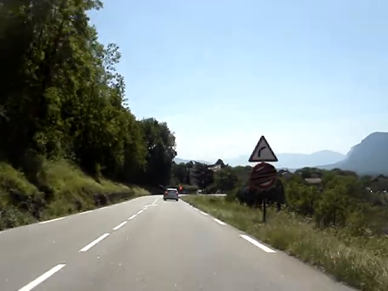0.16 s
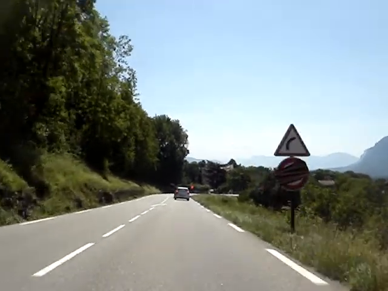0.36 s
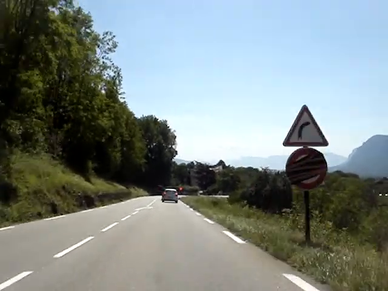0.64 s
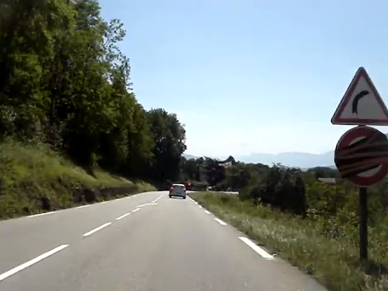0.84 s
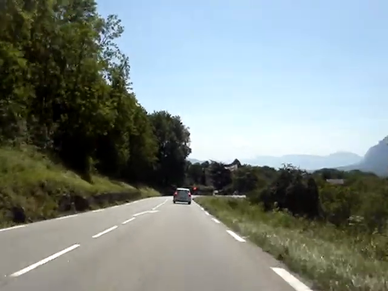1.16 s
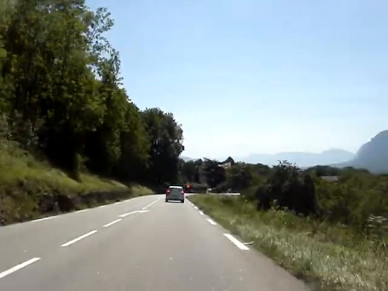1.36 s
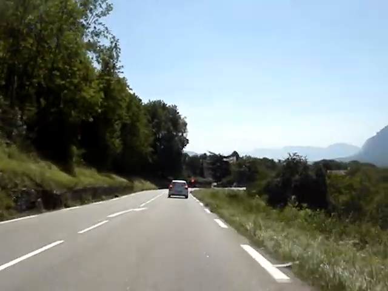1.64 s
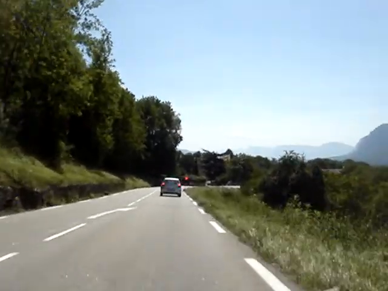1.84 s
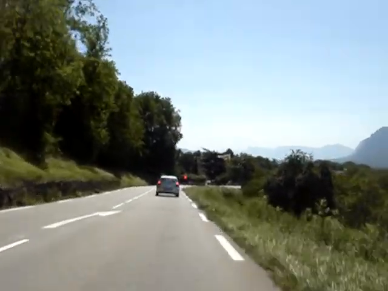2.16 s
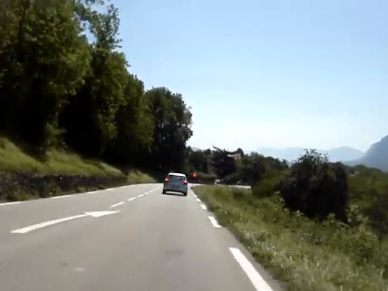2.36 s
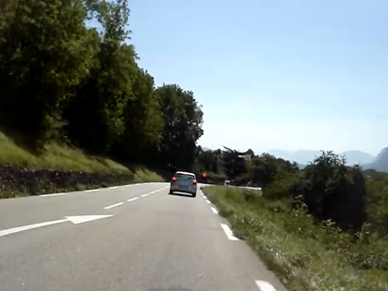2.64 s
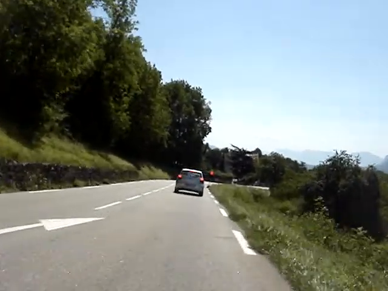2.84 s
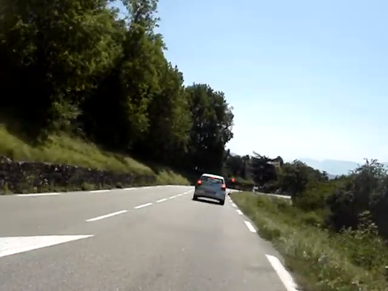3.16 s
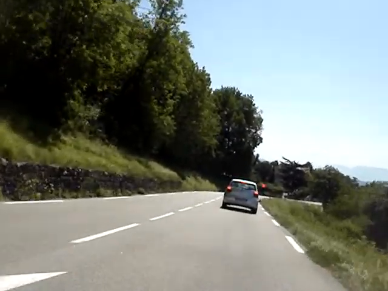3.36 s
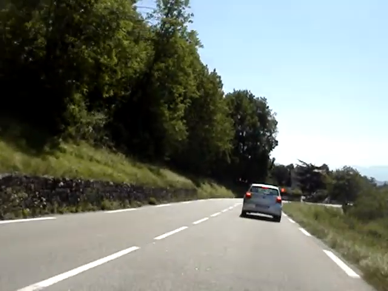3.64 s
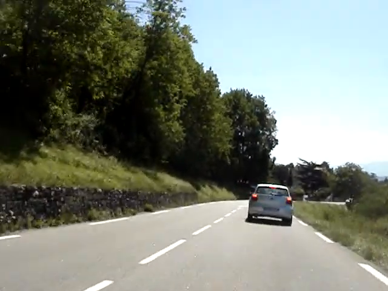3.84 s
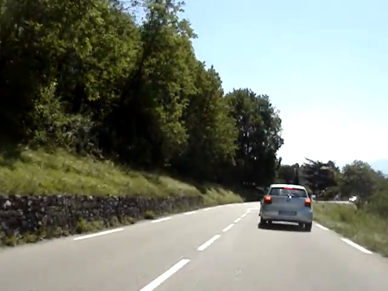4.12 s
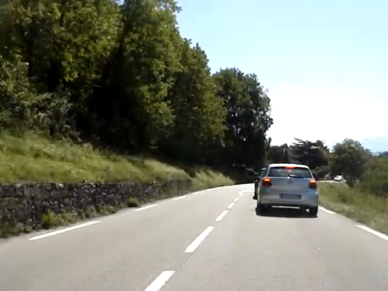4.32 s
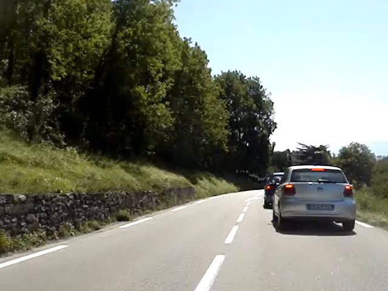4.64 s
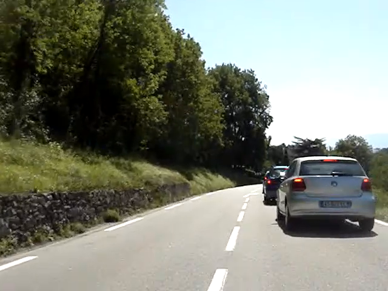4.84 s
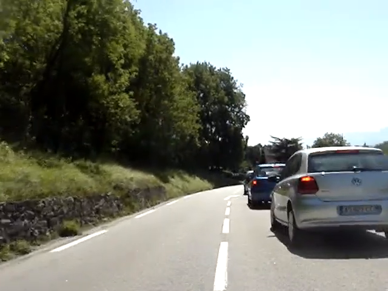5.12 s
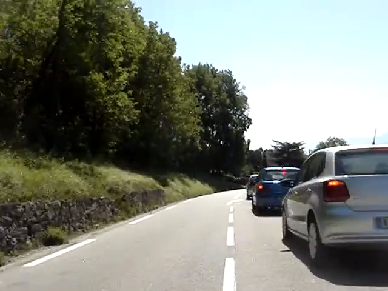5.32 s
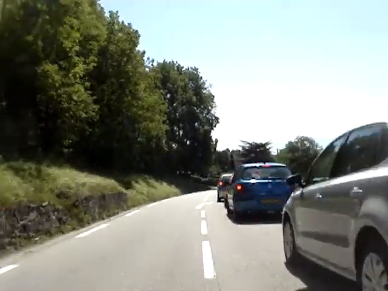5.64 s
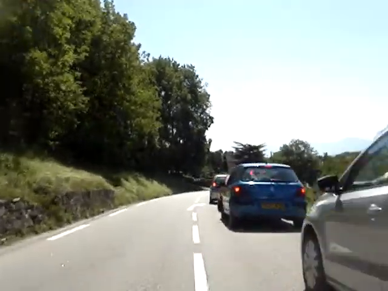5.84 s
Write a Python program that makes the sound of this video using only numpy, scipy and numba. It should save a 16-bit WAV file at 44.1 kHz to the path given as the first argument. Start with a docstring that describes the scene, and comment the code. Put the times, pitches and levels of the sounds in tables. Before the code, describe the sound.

Wind rushes over a small camera microphone on a bicycle coasting along an open road towards queued cars. Dense, irregular thumps and a rough roar dominate the first seconds, then become sparser and duller. Underneath run a low wake rumble and a steady raspy hiss of air and tyres, with short bright ticks, more frequent near the end. No distinct engines.

```python
"""Wind rushes over the microphone of a camera on a bicycle coasting down an open road towards a queue of cars.
Eddies sweep across the port, each one a single swing of pressure: countless small ones roar, big ones thump.
Behind them the camera's wake rumbles, air and tyres hiss through the ringing housing,
with short bright ticks and gritty bursts in the hiss; a fast limiter holds the crests."""
import sys
import numpy as np
from scipy import signal
from scipy.fft import rfft, irfft
from scipy.io import wavfile
from scipy.ndimage import uniform_filter1d, minimum_filter1d, map_coordinates
from numba import njit

SR = 44100
rng = np.random.default_rng(int(sys.argv[2]) if len(sys.argv) > 2 else 0)


def materialize(psi):
    """Save the field psi as 16-bit PCM at rate SR to the path in sys.argv[1].

    A 1-D psi becomes a single channel; in a 2-D psi each row is a channel.
    """
    bounded = np.clip(np.atleast_2d(psi).T, -1, 1)
    quanta = np.round(bounded * 32767).astype(np.int16)
    wavfile.write(sys.argv[1], SR, quanta)


N = 263718
TIME = np.arange(N) / SR  # s


def undb(db):
    """Decibels to gain."""
    return 10 ** (np.asarray(db) / 20)


def unit(x):
    """Scale to rms 1."""
    return x / np.sqrt(np.mean(x ** 2))


def curve(rows):
    """Rows (s, value) joined by straight lines."""
    return np.interp(TIME, *np.transpose(rows))


def walk(rate):
    """Smooth random course through about rate knots a second; rms 1."""
    knots = rng.standard_normal(N // 10)
    return unit(map_coordinates(knots, [TIME * rate], order=2, mode="wrap"))


def below(x, hz):
    """The part of a sound under a frequency."""
    return signal.sosfiltfilt(signal.butter(4, hz, fs=SR, output="sos"), x)


def colour(x, points, modes=()):
    """Filter by a smooth spectrum, with the power of any resonances added to it."""
    f = np.arange(N // 2 + 1) * SR / N + 1e-6  # just above zero, for the logarithm
    hz, db = np.transpose(points)
    power = undb(np.interp(np.log(f), np.log(hz), db)) ** 2
    for centre, width, peak_db in modes:
        resonance = 1 / (1 + ((f - centre) / width) ** 2) ** 2
        power = power + undb(peak_db) ** 2 * resonance
    return irfft(rfft(x) * np.sqrt(power), N)


def rush(level_db=7, flutter_db=1.05, rasp_db=1.5, grit_db=1.54, waver_db=3.5, flicker_db=3.0,
         top_db=5.0, top_growth_db=2.5):
    """Air and tyres hiss through the housing; the middle rasps, the treble level wavers fast and unevenly."""
    # steady rush of air and tyres: time_s [s], level_db [dB, relative]
    rush_levels = [(0.05, -42), (0.25, -44), (0.75, -45.5), (1.2, -42.5), (1.55, -43.5), (1.9, -40),
                   (2.11, -45), (2.22, -42.5), (2.8, -43), (3.36, -40.5), (3.45, -46), (3.52, -40),
                   (3.8, -43.5), (4.5, -42), (4.82, -44), (4.95, -42), (5.08, -42.5), (5.417, -42),
                   (5.428, -47), (5.53, -44), (5.66, -42), (5.98, -40)]
    # tone of the rush: frequency_hz [Hz], density_db [dB per Hz, relative]
    rush_tone = [(100, -7), (500, -23.5), (950, 4.5), (1250, 6.5), (1800, -1), (2400, -1), (3200, -2),
                 (4200, -7.5), (5500, -16.5), (7300, -24), (8500, -23.5), (10000, -28.5)]
    # cavities of the housing: centre_hz [Hz], half_width_hz [Hz, to a quarter of the power], peak_db [dB, relative]
    cavities = [(858, 78, 11.5), (1467, 23, 12.5), (1748, 53, 6), (2082, 103, 5.5), (2850, 296, 1.5),
                (4740, 120, -11.5)]
    hiss = unit(colour(rng.standard_normal(N), rush_tone, cavities))
    body, under_top, under_air = below(hiss, 1400), below(hiss, 5100), below(hiss, 7000)
    progress = TIME / TIME[-1]

    rasp_course_db = rasp_db * walk(220) + grit_db * progress ** 2 * walk(70)
    rasp = (under_top - body) * undb(rasp_course_db)

    # two treble bands share the wavering; each flickers by itself
    waver = waver_db * walk(300)
    top = 0
    for band in (under_air - under_top, hiss - under_air):
        top = top + band * undb(waver + flicker_db * walk(150))
    # the treble grows towards the queue of cars
    top = top * undb(top_db + top_growth_db * progress)

    fluttering = (body + rasp) * undb(flutter_db * walk(50))
    return (fluttering + top) * undb(curve(rush_levels) + level_db)


def ticks(level_db=-6, click_db=5):
    """Short bright ticks and gritty bursts in the hiss: a click and decaying noise, each with its own brightness."""
    # ticks and bursts: start_s [s], level_db [dB, relative], bright_hz [Hz], decay_s [s, to 1/e of amplitude]
    tick_rows = [(1.156, -27, 5500, .003), (1.1965, -24, 5000, .003), (1.2045, -28, 5500, 0.0036),
                 (1.2685, -36, 6000, .001), (1.392, -31, 5500, .003), (3.3495, -26, 4500, .0045),
                 (3.479, -25.5, 5600, .0045), (4.1451, -17, 5500, .001), (4.17, -27, 5540, .003),
                 (4.233, -29, 5500, .004), (4.285, -30, 5500, .004), (4.6942, -17.5, 4600, .0055),
                 (4.914, -24, 3100, .0045), (4.993, -24, 2820, .004), (5.012, -23, 3020, .003),
                 (5.124, -23.5, 2900, .004), (5.188, -23, 2700, .004), (5.2745, -21, 3500, .0045),
                 (5.366, -20.5, 2920, .004), (5.407, -27, 4000, .003), (5.4179, -20.5, 6200, .0013)]
    # tone of a tick: multiple [of its bright_hz], density_db [dB per Hz, relative]
    tick_tone = [(.13, -32), (.62, 4.5), (.92, 4.5), (1.2, 0), (1.7, -6), (2.6, -31)]
    out = np.zeros(N)
    noise = rng.standard_normal(N)
    for start, db, hz, decay_s in tick_rows:
        points = [(hz * multiple, gain_db) for multiple, gain_db in tick_tone]
        click = colour(signal.unit_impulse(N, int(start * SR)), points)
        decay = np.exp(-np.minimum(np.abs(TIME - start) / decay_s, 20))
        burst = unit(colour(noise, points)) * (TIME >= start) * decay
        out += undb(db + level_db) * (burst + undb(click_db) * click / click.max())
    return out


def rumble(gust_db, flutter_db=2.0, level_db=-34, growth_db=3.0, follow=0.44):
    """The camera's broad wake flutters low, swells and drops with the gusts and grows towards the cars ahead."""
    # tone of the wake: frequency_hz [Hz], density_db [dB per Hz, relative]
    wake_tone = [(20, -9.5), (45, -12.5), (70, -5), (110, 3), (200, 0), (400, -15), (800, -4), (2000, -56)]
    wake = unit(colour(rng.standard_normal(N), wake_tone))
    swell_db = follow * (gust_db - gust_db.mean())
    growth = growth_db * TIME / TIME[-1]
    return wake * undb(level_db + swell_db + growth + flutter_db * walk(25))


def turbulence(attack_s=0.027, release_s=0.0055):
    """Relative level in dB at the port: each gust swells, holds and dies away over the breeze."""
    # gusts that break on the port: start_s [s], length_s [s], strength_db [dB, relative]
    gusts = [(0.172, 0.17, -18), (0.43, 0.1, -21.5), (0.554, 0.16, -23), (0.812, 0.16, -21),
             (1.105, 0.086, -21), (1.317, .105, -21.5), (1.574, 0.13, -20), (1.895, 0.23, -22),
             (2.06, 0.17, -21.5), (2.542, 0.058, -25.5), (3.11, 0.23, -22.5), (3.269, 0.059, -25),
             (3.367, 0.035, -19.5), (4.18, 0.1, -26.5), (4.438, 0.12, -24), (4.616, 0.045, -24)]
    # turbulence left between the gusts: time_s [s], level_db [dB, relative]
    breeze = [(0, -21), (0.74, -30), (1.05, -22.5), (1.3, -24), (1.5, -22.5), (1.83, -24.5), (2.25, -25.5),
              (2.68, -28), (3.2, -26.5), (3.56, -23), (4.0, -26.5), (4.8, -29), (4.95, -27), (5.41, -28),
              (5.44, -35), (5.55, -35.5), (5.63, -27), (5.98, -26.5)]
    power = undb(curve(breeze)) ** 2
    for start, length, db in gusts:
        before = np.maximum(start - TIME, 0) / attack_s
        after = np.maximum(TIME - start - length, 0) / release_s
        gust = undb(db) ** 2 * np.exp(-np.minimum(before + after, 20) ** 2)
        power = np.maximum(power, gust)
    return 10 * np.log10(power)


def eddies(times, sizes, pitches, sharpness=2.64, skew=0.54):
    """Each passing vortex gives a dip, a crest, then suction, deeper with more skew; small ones pass faster."""
    index = (times * SR).astype(int)[:, None] + np.arange(-300, 300)  # samples around each passage
    # the spectrum of each swing peaks at its pitch
    passage = 2 * np.pi * pitches[:, None] * (index / SR - times[:, None]) / sharpness
    angle = np.arctan(passage)
    swing = np.cos(angle) ** (sharpness + 1) * np.cos(skew + (sharpness + 1) * angle)
    return np.bincount((index % N).ravel(), (sizes[:, None] * swing).ravel(), N)


def stream(gust_db, count, start_hz, end_hz, spread, scatter_db, rise, small_loss_db=3.0):
    """Random eddies at rms 1, brighter in gusts and duller as the bicycle slows; the smallest are weaker."""
    place = rng.random(count)
    size, pitch = rng.standard_normal((count, 2)).T
    times = (np.arange(count) + place) / count * N / SR
    force_db = np.interp(times, TIME, gust_db - gust_db.mean())
    middle_hz = np.interp(times, TIME[[0, -1]], [start_hz, end_hz])
    pitches = middle_hz * np.exp(spread * np.clip(pitch, -2, 2) + rise * force_db)
    sizes = undb(scatter_db * np.minimum(size, 2) - small_loss_db * np.maximum(pitch, 0) ** 2)
    return unit(eddies(times, sizes, pitches, sharpness=6.3, skew=0.59))


def roar(gust_db, coarse_db=-3.0, fine_db=-9.5, fine_growth=0.24):
    """Middling eddies roar; strong gusts break them up into finer, crackling ones."""
    coarse = stream(gust_db, count=2400, start_hz=460, end_hz=354, spread=0.39, scatter_db=5.0, rise=0.002)
    fine = stream(gust_db, count=1500, start_hz=860, end_hz=685, spread=0.33, scatter_db=5.5, rise=0.029)
    break_up_db = fine_db + fine_growth * (gust_db - gust_db.mean())
    return undb(gust_db) * (coarse * undb(coarse_db) + fine * undb(break_up_db))


def buffets(level_db=6.5, swirl_db=-7.5, swirl_s=0.001634, swirl_ratio=1.495, swirl_scatter_db=2.5,
            snap_start_hz=1250, snap_end_hz=850, thud_db=-17, thud_limit_db=-7, thud_hz=145):
    """Big eddies thump on the diaphragm, each with a faster swirl on either flank, a snap and a low thud."""
    # big eddies: time_s [s], size_db [dB, relative], pitch_hz [Hz], snap_db [dB, added to size_db]
    thumps = [(0.072, -20, 430, -14), (0.1266, -18.5, 430, -20), (0.141, -17.5, 410, -17),
              (0.156, -7, 378, -17), (0.161, -18, 320, -14), (0.1674, 3.5, 450, -16),
              (0.177, -14, 530, -10), (0.184, -4, 353, -4), (0.2246, -3.5, 563, -4), (0.2325, -2, 420, -7),
              (0.2505, -6, 540, -16), (0.2582, -1, 490, -14), (0.269, -21, 680, -14), (0.2752, -8, 330, -8),
              (0.291, -16, 480, -13), (0.2967, -7, 376, -15), (0.3141, -4, 348, -15),
              (0.3241, -8, 344, -13), (0.349, -20, 590, -15), (0.3944, -15, 430, -18),
              (0.4223, -17, 483, -18), (0.434, -17, 650, -15), (0.4457, -0.5, 455, -9),
              (0.483, -14, 553, -12), (0.4932, -7, 414, -3), (0.5, -24, 480, -12), (0.505, -12, 580, 0),
              (0.546, -14, 390, -10), (0.5555, -6, 630, 2), (0.563, -4, 384, -7), (0.572, -11, 450, -4),
              (0.5808, -7, 500, -12), (0.5928, -15, 620, -9), (0.5984, -4, 480, -8), (0.6087, -5, 365, -5),
              (0.617, -16, 560, -12), (0.6259, -11, 540, 4), (0.635, -17, 600, -8), (0.6442, -6, 397, 4),
              (0.6531, -11, 420, -14), (0.6624, -11, 425, -5), (0.675, -10, 527, -24),
              (0.693, -1, 480, -10), (0.7034, -9, 530, -14), (0.712, -0.5, 600, 0), (0.729, -6, 430, -5),
              (0.7441, -11, 350, -12), (0.757, -7, 483, -22), (0.7767, -11.5, 357, -16),
              (0.784, -16, 470, -14), (0.798, -11, 430, -15), (0.836, -4.5, 420, -25),
              (0.858, -18, 530, -12), (0.871, -16, 390, -5), (0.885, -18, 480, -4), (0.8975, -7, 436, -6),
              (0.9461, -10, 386, -15), (0.9607, -9, 350, -13), (1.029, -19, 480, -12),
              (1.1072, -6, 465, -12), (1.138, -16, 650, -15), (1.144, -12, 390, -5), (1.162, -10, 480, -7),
              (1.183, -11, 434, -4), (1.1912, -12, 600, -26), (1.1987, -17, 390, -4), (1.221, -1, 505, -8),
              (1.2387, -4, 432, -2), (1.2478, -0.5, 520, -5), (1.2565, -5, 390, -12),
              (1.267, -22, 430, -14), (1.2791, -7, 440, -14), (1.2898, -7, 390, -13), (1.31, -22, 400, -16),
              (1.3188, -1, 470, -10), (1.328, -6, 540, -15), (1.3356, -8, 300, -5), (1.3445, -14, 390, -11),
              (1.3539, -7, 403, -17), (1.362, -10, 420, -13), (1.372, -17, 390, -5), (1.394, -18, 580, -14),
              (1.4028, -10, 346, -10), (1.4204, 1, 370, -5), (1.468, -18, 570, -12),
              (1.499, -15.5, 470, -12), (1.504, -18, 377, -14), (1.534, -20, 360, -12),
              (1.543, -16, 430, -14), (1.5633, -11, 300, -4), (1.5987, -13, 370, -10), (1.6071, 1, 330, -8),
              (1.636, -21, 420, -12), (1.653, -15, 440, -10), (1.6683, -9, 346, -1), (1.7063, -6, 350, -10),
              (1.7162, -15, 310, -18), (1.77, -20, 436, -15), (1.78, -9, 336, -17), (1.889, -22, 450, -12),
              (1.897, -17, 550, -15), (1.9095, -15, 640, -17), (1.9142, -14, 353, -16),
              (1.9548, -6, 410, -22), (1.9648, -9, 332, -31), (1.9756, -17, 380, -6),
              (1.985, -17, 520, -14), (2.008, -15, 400, -12), (2.02, -4, 395, -18), (2.0655, 0, 446, -15),
              (2.074, -15, 490, -16), (2.089, -20, 460, -12), (2.096, -8, 433, -17), (2.1143, -8, 310, -7),
              (2.144, -9, 308, -7), (2.157, -7, 393, -6), (2.1975, -12.5, 390, -10),
              (2.215, -17.5, 370, -14), (2.233, -16.5, 610, -15), (2.247, -19, 590, -12),
              (2.3065, -1, 460, -19), (2.3888, -5, 382, -26), (2.406, -21, 440, -14),
              (2.428, -16.5, 430, -18), (2.4554, -4.5, 400, -9), (2.5018, -13.5, 280, -8),
              (2.517, -18.5, 440, -16), (2.528, -18, 405, -15), (2.537, -17, 523, -18),
              (2.5466, -9, 343, -18), (2.553, -18, 398, -20), (2.574, -9, 388, -12),
              (2.588, -7.5, 308, -20), (2.629, -21.5, 350, -14), (2.7271, -15, 343, -14),
              (2.7386, -12, 382, -10), (2.746, -19, 380, -12), (2.7706, -13.5, 280, -17),
              (2.7973, -6, 278, -20), (2.9333, -6, 427, -10), (2.9517, -3.5, 420, -20),
              (3.018, -2.5, 430, -19), (3.025, -6, 420, -19), (3.048, -21, 400, -16),
              (3.0702, -12, 348, -24), (3.098, -15, 330, -1), (3.112, -9, 390, -12), (3.122, -18, 390, -8),
              (3.139, -14, 390, -11), (3.15, -16, 318, -18), (3.161, -23.5, 360, -12),
              (3.1699, -15, 440, -10), (3.176, -23, 360, -14), (3.188, -1.5, 380, -12),
              (3.22, -20, 320, -12), (3.237, -22, 418, -20), (3.2661, -4, 330, -10), (3.292, -12, 452, -14),
              (3.3016, 1, 406, -5), (3.32, -14, 450, -12), (3.331, -8, 390, -10), (3.3492, -11, 360, -14),
              (3.37, -4, 350, -24), (3.374, -14, 560, -14), (3.3843, -6, 390, -18), (3.395, -2, 286, -3),
              (3.4035, 3, 430, 4), (3.4129, -7, 310, -7), (3.4308, -1, 387, -19), (3.495, -23, 320, -14),
              (3.6987, -3.5, 485, -22), (3.765, -17.5, 450, -14), (3.7902, -11, 347, -12),
              (3.8053, -6.5, 346, -3), (3.817, -20, 380, -16), (3.882, -15.5, 384, -20),
              (3.908, -2, 424, -13), (3.9185, -12, 346, -9), (4.0549, -15, 345, -22),
              (4.146, -11, 310, -10), (4.1868, -4, 322, -3), (4.199, -7.5, 316, -18),
              (4.2281, -15.5, 387, -8), (4.2447, -5, 386, -7), (4.2629, -11, 383, -11),
              (4.274, -10, 390, -16), (4.288, -10, 436, -14), (4.3035, -1, 343, -26),
              (4.348, -7.5, 370, -18), (4.4032, -12, 384, -10), (4.429, -15, 360, -16),
              (4.4451, -9, 350, -17), (4.458, -15, 348, -16), (4.471, -19, 460, -18),
              (4.4848, -4, 363, -19), (4.5006, -13, 330, -14), (4.514, -7, 390, -8), (4.523, -19, 450, -14),
              (4.538, -17.5, 440, -16), (4.545, -19, 537, -18), (4.579, -17.5, 330, -16),
              (4.63, -5, 290, -24), (4.6442, -10, 374, -21), (4.669, -4.5, 308, -20),
              (4.7205, -15, 285, -10), (4.7624, -10, 263, -10), (4.8007, -9, 297, -15),
              (4.8276, -20, 300, -15), (4.9493, -11, 410, -13), (4.9977, -9, 326, -9),
              (5.013, -23, 510, -14), (5.045, -26, 480, -14), (5.071, -22, 350, -12),
              (5.204, -21, 453, -16), (5.224, -27, 390, -17), (5.274, -22.5, 346, -14),
              (5.467, -21.5, 306, -20), (5.5894, -11, 290, -14), (5.5935, -14, 306, -21),
              (5.635, -25, 340, -14), (5.641, -19, 345, -14), (5.6926, -16.5, 280, -13),
              (5.7896, -23, 330, -8), (5.7989, -18.5, 330, -12), (5.871, -24, 410, -11),
              (5.9382, -25, 310, -21), (5.954, -20, 437, -16.5)]
    times, db, hz, snap_db = np.transpose(thumps)
    out = eddies(times, undb(db + level_db), hz, sharpness=3.76, skew=1.26)

    thud_sizes = undb(np.minimum(db, thud_limit_db) + thud_db)
    out = out + eddies(times, thud_sizes, np.full(len(times), thud_hz), sharpness=3.1, skew=0.87)

    chance = 2 * rng.random((len(times), 2, 3)) - 1
    for flank, (lag, size, pitch) in zip((-1, 1), chance.transpose(1, 2, 0)):
        swirl_times = times + flank * swirl_s * (1 + .5 * lag)
        swirl_hz = swirl_ratio * hz * np.exp(.25 * pitch)
        swirl_sizes = undb(db + swirl_db + swirl_scatter_db * size)
        out = out + eddies(swirl_times, swirl_sizes, swirl_hz, sharpness=8.8, skew=0.036)

    # the snap dulls as the bicycle slows
    snap_hz = np.interp(times, TIME[[0, -1]], [snap_start_hz, snap_end_hz])
    return out + eddies(times, undb(db + snap_db), snap_hz, sharpness=8.0, skew=1.97)


def scene(port_hz=2500):
    """All that reaches the one microphone; the port smooths out eddies smaller than itself."""
    gust_db = turbulence()
    wind = below(roar(gust_db) + buffets(), port_hz)
    return (wind + rumble(gust_db) + rush() + ticks())[None]


@njit
def crest_follower(x, ceiling, release):
    """Jumps to every positive crest above its held level and sinks back to the ceiling."""
    held, out = ceiling, np.empty(len(x))
    for i in range(len(x)):
        held = max(x[i], held + (ceiling - held) * release)
        out[i] = held
    return out


def record(dry, ceiling=.43, release_s=0.002, bass_hz=40, top_hz=10050):
    """A fast limiter that senses positive crests only, then a soft cut of the bass and a steep one of the treble."""
    gain = ceiling / crest_follower(dry[0], ceiling, 1 / (release_s * SR))
    # the gain eases down just before each crest, which rounds its top
    gain = uniform_filter1d(minimum_filter1d(gain, size=13), size=13)
    bass_cut = signal.butter(2, bass_hz, "high", fs=SR, output="sos")
    treble_cut = signal.ellip(12, .2, 70, top_hz, fs=SR, output="sos")
    limited = signal.sosfilt(bass_cut, dry * gain)
    return signal.sosfilt(treble_cut, limited)


dry = scene()
out = record(dry)
materialize(out)
```